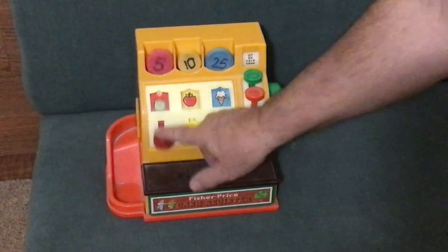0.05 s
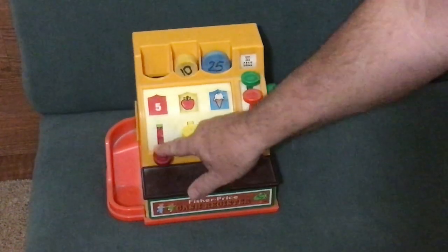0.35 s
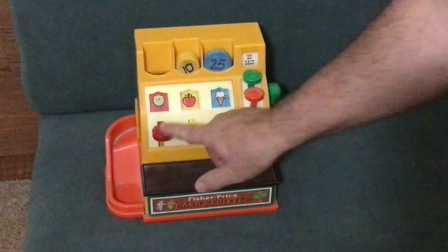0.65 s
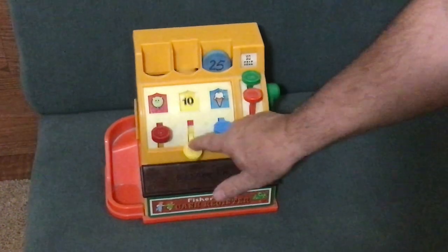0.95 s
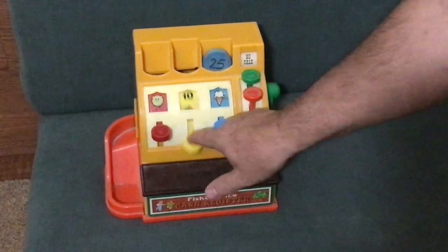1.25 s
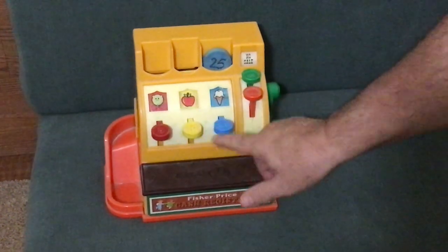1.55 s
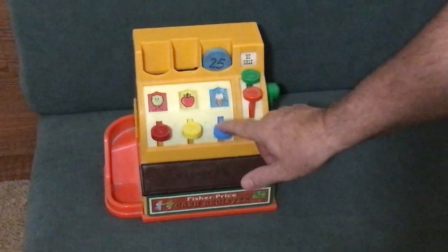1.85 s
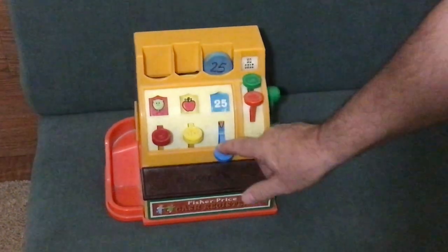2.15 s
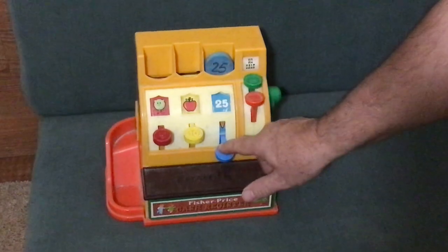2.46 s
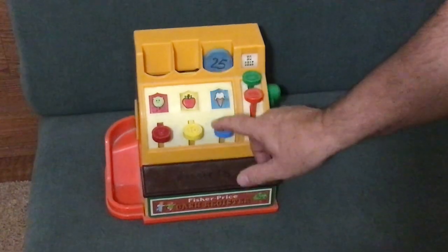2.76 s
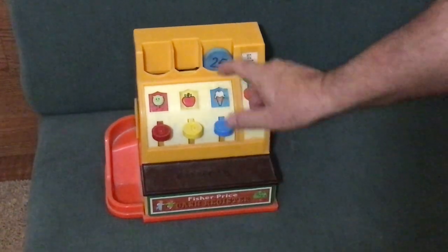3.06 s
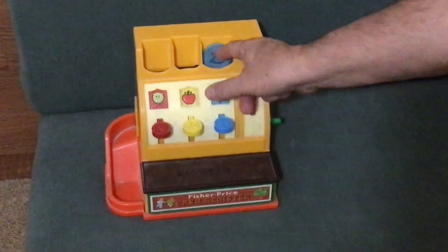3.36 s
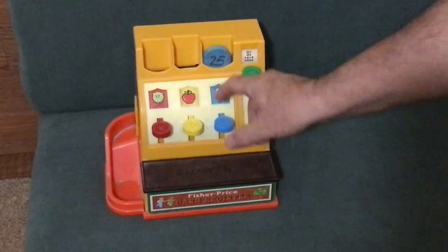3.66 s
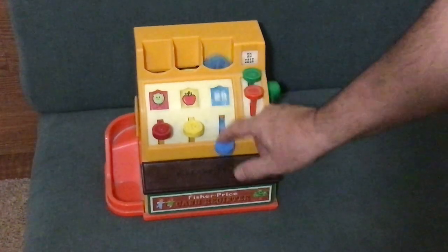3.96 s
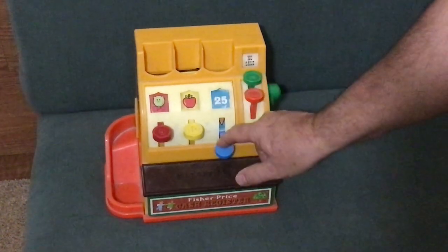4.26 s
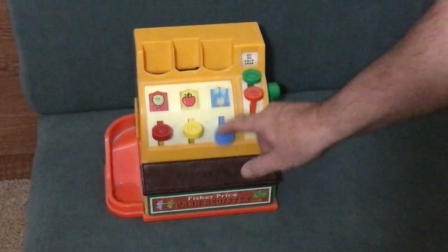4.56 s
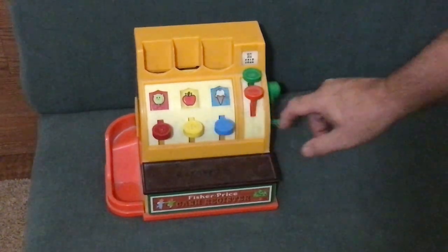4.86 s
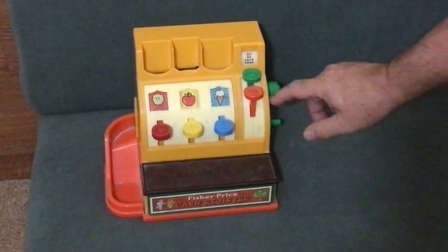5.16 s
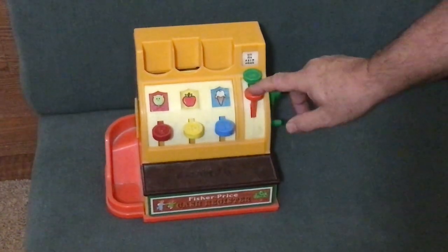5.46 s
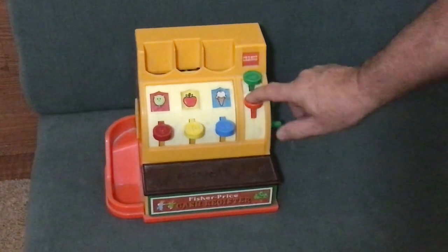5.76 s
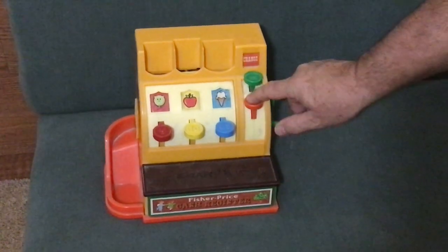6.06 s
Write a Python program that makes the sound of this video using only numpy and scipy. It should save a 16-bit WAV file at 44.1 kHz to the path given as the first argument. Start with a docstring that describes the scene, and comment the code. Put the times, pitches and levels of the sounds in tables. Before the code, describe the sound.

In a small, quiet room with a faint hum, a nearby toy cash register is played with. Its plastic keys rub and click in their slots, sending two wooden coins knocking into the hollow body. Softer scrapes, two tiny squeaks and a few finger knocks follow before a third coin drops. At the end, a lever clacks three times in quick succession, leaving a steel spring ringing briefly.

```python
"""A plastic key scrapes down and clicks, then a wooden coin drops inside a hollow toy cash register.
Three keys do this in turn and scrape back up; a stem squeaks twice, a fingertip brushes the case.
At the end a lever clacks three times. Each impact rings the thin walls and the case modes;
hard knocks twang steel return springs. The toy sits on a sofa in a small, quiet room
where an appliance hums softly."""
import sys
import numpy as np
from scipy import signal
from scipy.fft import rfft, irfft
from scipy.io import wavfile
from scipy.ndimage import uniform_filter1d

SR = 44100
rng = np.random.default_rng(int(sys.argv[2]) if len(sys.argv) > 2 else 0)


def to_wav(sig):
    """Store sig (one row per channel, or 1-D mono) as 16-bit WAV at the path in sys.argv[1].

    Samples outside -1..1 are clipped; the rate is SR.
    """
    pcm = np.clip(np.atleast_2d(sig), -1, 1) * 32767
    pcm = np.round(pcm).astype(np.int16)
    wavfile.write(sys.argv[1], SR, pcm.T)  # frames by channels


N = 269892

# Keys, tabs and fingers knocking on the case. Each row: start in seconds, clack level in dB,
# bass weight in dB, treble dullness in dB, ring time factor, struck part's note in Hz.
KEY_HITS = [(0.1205, -53.5, -4.5, 2, 0.79, 1500), (0.1815, -49.5, -9, 32, 0.97, 2405),
            (0.231, -63.5, 8, 27, 1.1, 2280), (0.268, -62, 1, 10, 0.8, 1520),
            (0.284, -66, 4, 28, 1.8, 1530), (0.721, -84, 19, 10, .9, 2160), (0.919, -55, 2, -1, 0.53, 2810),
            (0.9625, -58, 3, 29, 1.26, 1474), (1.037, -58, -13, 19, 0.4, 2930),
            (1.0478, -50, -5.5, 16, 0.43, 3840), (1.4675, -55, -2, 15.5, 1.23, 2820),
            (1.502, -73, 6, 11, .6, 1400), (2.154, -62, 4.5, 25.5, 0.55, 1800),
            (2.787, -71, 9, 10.5, 0.96, 3240), (2.808, -70, 6.5, 13, 1.1, 3030),
            (2.8932, -78.5, 1, 5.5, 0.3, 4800), (3.1185, -61.5, -9, 23.5, .67, 3090),
            (3.121, -71, 11.5, 17, 1, 554), (3.273, -66.5, 12.5, 18, 1.1, 2120),
            (3.2825, -44.5, -6, 23.5, 0.9, 814), (3.388, -64.5, -2, 22, 1.3, 3420),
            (3.593, -80.5, 15, 19, 1.38, 1300), (3.9705, -44, -9, 27.5, 0.86, 2270),
            (4.0493, -48.5, 1, 16, 1.03, 168), (4.071, -64, 4, 19, .7, 2610),
            (4.688, -65, 3.5, 30.5, 1.3, 2840)]
# Coin landings. Each row: as KEY_HITS, then first hop in seconds, loss per hop in dB.
COIN_DROPS = [(0.3265, -31, -18, 20, .86, 2147, 0.0585, 18),
              (1.0757, -31.5, -15.5, 17, .76, 2523, 0.0705, 10.5),
              (4.1263, -36.5, -8.5, 16, 0.79, 1554, 0.0437, 17.5)]
# Lever impacts. Each row: as KEY_HITS.
LEVER_HITS = [(5.471, -84.5, -1.5, 16, .8, 2890), (5.6195, -78, -2, 8, .8, 2300),
              (5.6915, -54.5, 0.5, 21, 1.44, 2710), (5.7128, -34, -6.5, 9, 1.16, 2310),
              (5.762, -46.5, -2.5, 29, 0.78, 1900), (5.795, -51, -4, 36, 0.94, 2300),
              (5.817, -35.5, -9.5, 14, 1.23, 2604), (5.8252, -33.5, -14.5, 20.5, 0.95, 1530),
              (5.8765, -44.5, -4.5, 27, 2, 1555), (5.926, -34, -11, 15.1, 0.82, 1880)]
# Thump, knock, clack, click and tick bands. Each row: low edge in Hz, high edge in Hz.
BANDS_HZ = [(120, 620), (620, 1300), (1300, 3300), (3300, 7000), (7000, 18000)]
# Wall response in those bands. Each row: T60 in seconds, rise in seconds.
WALL_TIMES_S = [(0.135, 0.0014), (.075, 0.0008), (0.043, 0.00039), (.047, .0008), (.048, 0.00039)]
# Spectra of the case, key scrape, key hiss, fingertip and room air.
# Each row: frequency in Hz, relative level in dB.
CASE_COLOUR = [(100, -25), (170, -1), (350, 3.5), (620, -11), (950, -6), (1200, -12), (1550, -1.5),
               (2500, 2), (3100, -1.5), (3400, -4), (5200, -2.5), (7200, -13.5), (10000, -14.5),
               (16000, -23.5)]
SCRAPE_COLOUR = [(120, -26), (330, 12), (650, -0.5), (1000, -1), (1900, -2.5), (3000, -1.5), (3800, -5.5),
                 (5500, -11), (8000, -22), (16000, -30)]
HISS_COLOUR = [(2000, -29.5), (5000, -4.5), (8000, 0.5), (11000, 1.5), (13000, -5.5), (16000, 3)]
FINGER_COLOUR = [(300, -0.5), (1200, -5), (2500, -2), (4200, 0.5), (7000, -15), (16000, -21.5)]
AIR_COLOUR = [(22, -54.5), (38, -19), (75, -10), (105, -12.5), (170, -1), (250, -1.5), (340, -10),
              (620, -17), (1100, -26.5), (2500, -33), (7000, -44), (11000, -43), (16000, -51)]
# Modes of the case and springs. Each row: frequency in Hz, relative level in dB, T60 in seconds.
CASE_MODES = [(180, -8, 0.095), (333.3, -0.5, 0.19), (368.2, 0, 0.11), (414, -2.5, .12), (540, -10, 0.077),
              (720, -8.5, .08), (813, -4.5, 0.1), (946, 2, 0.14), (1420, -7, .1), (1590, -9, 0.11),
              (1870, -6.5, .08), (2170, -8, .09), (2230, -3, .06), (2440, -5, 0.058), (2613, -2.5, .08),
              (3000, -5, .08), (3090, -8, 0.087), (3730, -1, 0.093), (4350, -4.5, .06), (4400, -16, .07),
              (5030, -10.5, 0.11), (5400, -12.5, .06), (5700, -14.5, 0.064), (6400, -9.5, .06),
              (6820, -9, .05)]
KEY_SPRING_MODES = [(1430, -12, .7), (1663, -8.5, .5), (2150, -0.5, 0.52), (2200, 1.5, 0.69),
                    (2555, -9.5, .4)]
LEVER_SPRING_MODES = [(1940, -1, 0.28), (2660, -5.5, 0.36), (2830, -16, 0.48), (3400, -17, 0.24),
                      (3690, -1, 0.3), (3890, -5, 0.26), (5140, -10, 0.32), (5670, -16, 0.28)]
# Knocks on the springs. Each row: start in seconds, level in dB.
KEY_SPRING_TWANGS = [(.328, -52), (1.077, -53)]
LEVER_SPRING_TWANGS = [(5.713, -63), (5.826, -60), (5.926, -45)]
# Plastic sliding on plastic. Each row: start, length and run-up in seconds,
# then scrape level, hiss level and fade over the stroke in dB.
SLIDES = [(0.101, 0.24, 0.018, -58.5, -67.5, 12), (0.549, 0.2, .06, -62.5, -65, 13.5),
          (0.897, 0.21, .025, -61.5, -73.5, 5.5), (1.254, 0.21, 0.1, -65.5, -71, 11),
          (1.895, 0.19, 0.043, -69.5, -74.5, 10), (2.066, 0.11, 0.036, -67.5, -72, 0),
          (2.735, 0.11, 0.025, -55.5, -57, 21.5), (3.885, .235, 0.04, -64, -78.5, -1.5),
          (4.56, 0.15, 0.071, -63.5, -70.5, 3.5), (5.654, 0.33, 0.048, -57.5, -76, 9)]
# Fingertip stroke. One row: start, length and run-up in seconds, nominal level in dB.
# With its negative run-up it starts below that level and only fades.
FINGER_STROKE = (2.5, 0.33, -0.1, -73)
# Stem squeaks. Each row: start in seconds, length in seconds, initial pitch in Hz, level in dB.
STEM_SQUEAKS = [(2.081, 0.059, 2960, -66), (2.744, 0.046, 3040, -53.5)]
# Room decay. Each row: frequency in Hz, T60 in seconds.
ECHO_T60_S = [(150, 0.14), (400, 0.5), (1000, 0.74), (2500, 0.5957), (5000, .5), (9000, 0.42), (16000, 0.5)]
# Room response. Each row: frequency in Hz, echo level in dB.
ECHO_DB = [(150, -11), (400, -3.5), (1000, -6.5), (2500, -11.5), (5000, -11.5), (9000, -12.5),
           (16000, -19.5)]
# Appliance tones. Each row: frequency in Hz, level in dB.
HUM_LINES = [(58, -84), (120, -73), (1075, -92), (6270, -108)]


def keys():
    """Keys, tabs and fingers knock on the hollow case."""
    return impacts(KEY_HITS, room_db=0.1, modes_db=-10.5, note_db=4, note_t60_s=0.048,
                   face_delay_s=0.003, face_db=-21, sideways_db=-14.5)


def coins(contacts=3, hop_shrink=0.44, hop_dull_db=12.5, bass_kept=0.65):
    """Wooden coins land in the case; each hop is shorter, weaker and duller."""
    hits = []
    for start_s, level_db, bass_db, dull_db, ring, note_hz, hop_s, loss_db in COIN_DROPS:
        for k in range(contacts):
            hits.append((start_s, level_db - k * loss_db, bass_db + k * bass_kept * loss_db,
                         dull_db + np.sqrt(k) * hop_dull_db, ring, note_hz))
            start_s += hop_s
            hop_s *= hop_shrink
    return impacts(hits, room_db=-2, modes_db=-7, note_db=3.5, note_t60_s=0.05,
                   face_delay_s=0.0033, face_db=-5, sideways_db=-9.5)


def lever():
    """The lever is touched, catches, hits its stop and springs back."""
    return impacts(LEVER_HITS, room_db=-1.3, modes_db=-4.5, note_db=-3.5, note_t60_s=0.051,
                   face_delay_s=0.0044, face_db=-16, sideways_db=-7)


def impacts(hits, room_db, **material):
    """Direct sound of the hits plus the echo of their sideways sound."""
    front, around = np.zeros((2, N))
    for hit in hits:
        direct, sideways = case_impact(hit, **material)
        add(front, hit[0], direct)
        add(around, hit[0], sideways)
    return front + gain_of(room_db) * room(around)


def case_impact(hit, modes_db, note_db, note_t60_s, face_delay_s, face_db, sideways_db):
    """One hit, front and sideways: dense wall modes decay as noise, the main modes as tones."""
    _, clack_db, bass_db, dull_db, ring, note_hz = hit
    levels_db = clack_db + np.array([bass_db, -3.5 + 0.86 * bass_db, 0, -0.41 * dull_db, -dull_db])
    t = np.arange(SR // 3) / SR
    attack = t < 0.02
    noise = rng.standard_normal(len(t))
    modes = []
    for hz, db, t60_s in CASE_MODES:
        gain = gain_of(modes_db + db + 1.8 * rng.standard_normal())  # varies with contact point
        modes.append((hz, gain * decay(t, t60_s * ring) * np.sin(2 * np.pi * (hz * t + rng.random()))))
    note = gain_of(note_db) * decay(t, note_t60_s * ring) * np.sin(2 * np.pi * note_hz * t)
    modes.append((note_hz, note))
    # an edge touches first, then the whole face lands
    contact = 1 + gain_of(face_db) * np.clip((t - face_delay_s) / 0.00095, 0, 1)
    beam = np.array([[1], [gain_of(sideways_db)]])  # tones radiate mostly to the front
    out = np.zeros((2, len(t)))
    for band_hz, (t60_s, rise_s), level_db in zip(BANDS_HZ, WALL_TIMES_S, levels_db):
        walls = coloured(noise, CASE_COLOUR, band_hz) * decay(t, t60_s * ring)
        tones = sum(wave for hz, wave in modes if band_hz[0] <= hz < band_hz[1])
        onset = 1 - np.exp(-t / (rise_s * ring))
        part = (walls + beam * tones) * contact * onset
        out += gain_of(level_db) * part / part[:, attack].std(axis=1, keepdims=True)
    return out


def spring(modes, twangs):
    """A steel return spring rings on after a hard knock."""
    t, out = np.arange(SR) / SR, np.zeros(N)
    ring = sum(gain_of(db) * decay(t, t60_s) * np.sin(2 * np.pi * hz * t) for hz, db, t60_s in modes)
    for start_s, level_db in twangs:
        add(out, start_s, gain_of(level_db) * ring)
    return out


def sliding(slips_per_s=600, slip_t60_s=0.014, grip_db=1.7, scrape_fade_share=0.58):
    """Stems rub in their slots, a fingertip on the case: friction with tiny uneven slips."""
    slipping = rng.random(N) < slips_per_s / SR
    slips = slipping * gain_of(4 * np.minimum(rng.exponential(1, N), 3))
    rattle = signal.oaconvolve(slips, decay(np.arange(SR // 50) / SR, slip_t60_s))[:N]
    friction = rng.standard_normal(N) * (1 + 0.5 * unit_rms(rattle))
    grip = unit_rms(uniform_filter1d(rng.standard_normal(N), 500))
    friction *= gain_of(grip_db * grip)
    scrape, hiss = coloured(friction, SCRAPE_COLOUR), coloured(friction, HISS_COLOUR)
    out = coloured(friction, FINGER_COLOUR) * stroke(*FINGER_STROKE)
    for *timing_s, scrape_db, hiss_db, fade_db in SLIDES:
        out += scrape * stroke(*timing_s, scrape_db, scrape_fade_share * fade_db)
        out += hiss * stroke(*timing_s, hiss_db, fade_db)
    return out


def stroke(start_s, length_s, run_up_s, level_db, fade_db=0, onset_db=-20, stop_s=0.032):
    """Envelope of one slide: it gathers speed, slows and stops."""
    t = np.arange(N) / SR - start_s
    moving = (t >= 0) & (t < length_s)
    t, gain = t[moving], np.zeros(N)
    rising = np.minimum(t / run_up_s, 1)
    slowing = np.maximum((t - run_up_s) / (length_s - run_up_s), 0)
    shape_db = onset_db * (1 - rising) ** 1.5 - fade_db * np.sin(np.pi / 2 * slowing)
    gain[moving] = gain_of(level_db + shape_db) * np.minimum((length_s - t) / stop_s, 1)
    return gain


def squeaks(sag_hz_per_s=5000, jitter=0.05, shimmer=0.33, octave_db=-8):
    """A stiff key stem sticks and slips: an unsteady, sagging whistle with its octave."""
    out = np.zeros(N)
    for start_s, length_s, hz, level_db in STEM_SQUEAKS:
        t = np.arange(0, length_s, 1 / SR)
        noise = rng.standard_normal((2, SR))
        wobble, grip = (unit_rms(uniform_filter1d(row, 70))[:len(t)] for row in noise)
        pitch_hz = (hz - sag_hz_per_s * t) * (1 + jitter * wobble)
        phase = 2 * np.pi * np.cumsum(pitch_hz) / SR
        tone = (np.sin(phase) + gain_of(octave_db) * np.sin(2 * phase)) * (1 + shimmer * grip)
        arch = np.sin(np.pi * t / length_s)
        add(out, start_s, gain_of(level_db) * arch * unit_rms(tone))
    return out


def room(x, delay_s=0.0034, build_s=0.0027, taps_per_s=3000):
    """Sparse reflections build up and die away; the mids last longest."""
    t = np.arange(SR) / SR
    taps = rng.choice([-1., 1.], SR) * (rng.random(SR) < taps_per_s / SR)
    taps *= 1 - np.exp(-np.maximum(t - delay_s, 0) / build_s)
    hz, frame_s, spectra = signal.stft(taps, SR, nperseg=256)
    t60_s = lookup(ECHO_T60_S, hz)[:, None]
    gain = gain_of(lookup(ECHO_DB, hz))[:, None] * np.sqrt(2 * np.log(1000) / t60_s)
    spectra = spectra * decay(frame_s, t60_s) * gain
    tail = signal.istft(spectra, SR, nperseg=256)[1] / np.linalg.norm(taps)
    return signal.fftconvolve(x, tail)[:N]


def appliance(waver=0.31):
    """Mains hum and faint high tones, wavering slowly in level."""
    t = np.arange(N) / SR
    hum = sum(gain_of(db) * np.sqrt(2) * np.sin(2 * np.pi * (hz * t + rng.random()))
              for hz, db in HUM_LINES)
    drift = coloured(rng.standard_normal(N), [(1, -1), (8, -12)], band_hz=(0, 12))
    return hum * (1 + waver * drift)


def air(level_db=-66.5):
    """Low, steady rush of air."""
    return gain_of(level_db) * coloured(rng.standard_normal(N), AIR_COLOUR)


def gain_of(db):
    return 10 ** (np.asarray(db) / 20)


def unit_rms(x):
    return x / np.sqrt(np.mean(x ** 2) + 1e-20)


def decay(t, t60_s):
    return np.exp(-np.log(1000) * t / t60_s)


def lookup(points, hz):
    """Interpolates on a log-frequency axis."""
    points_hz, values = np.transpose(points)
    return np.interp(np.log(hz + 1), np.log(points_hz + 1), values)


def add(mix, start_s, sound):
    part = mix[round(start_s * SR):][:len(sound)]
    part += sound[:len(part)]


def coloured(x, colour, band_hz=(0, SR), order=12):
    """Shapes the spectrum inside a soft-edged band; rms 1."""
    hz = np.fft.rfftfreq(len(x), 1 / SR)
    skirts = (1 + (band_hz[0] / (hz + 1)) ** order) * (1 + (hz / band_hz[1]) ** order)
    return unit_rms(irfft(rfft(x) * gain_of(lookup(colour, hz)) / np.sqrt(skirts), len(x)))


def scene():
    """The register in its room, mono."""
    knocks = keys() + coins() + lever()
    springs = spring(KEY_SPRING_MODES, KEY_SPRING_TWANGS)
    springs += spring(LEVER_SPRING_MODES, LEVER_SPRING_TWANGS)
    rub, squeak = sliding(), squeaks()
    echo = room(rub + gain_of(-3) * squeak)
    return (knocks + springs + rub + squeak + echo + appliance() + air())[None]


def record(dry, low_cut_hz=36, high_cut_hz=16200):
    """Low cut and band limit."""
    highpass = signal.butter(4, low_cut_hz, "highpass", fs=SR, output="sos")
    lowpass = signal.firwin(511, high_cut_hz, window=("kaiser", 9), fs=SR)
    return signal.oaconvolve(signal.sosfilt(highpass, dry), lowpass[None], "same")


dry = scene()
out = record(dry)
to_wav(out)
```